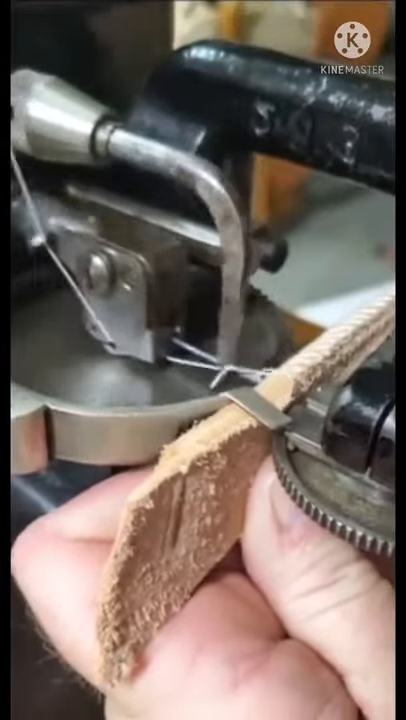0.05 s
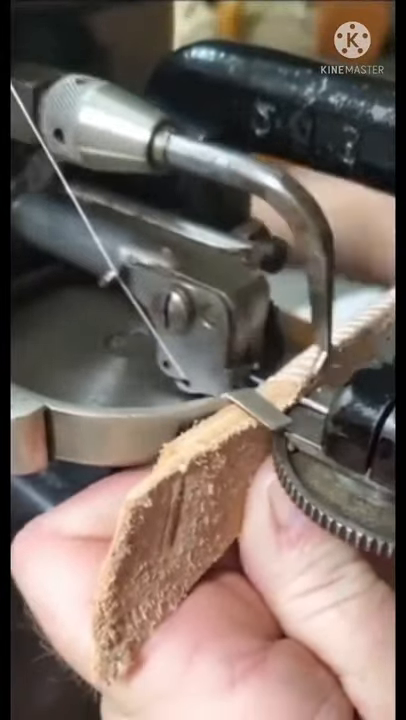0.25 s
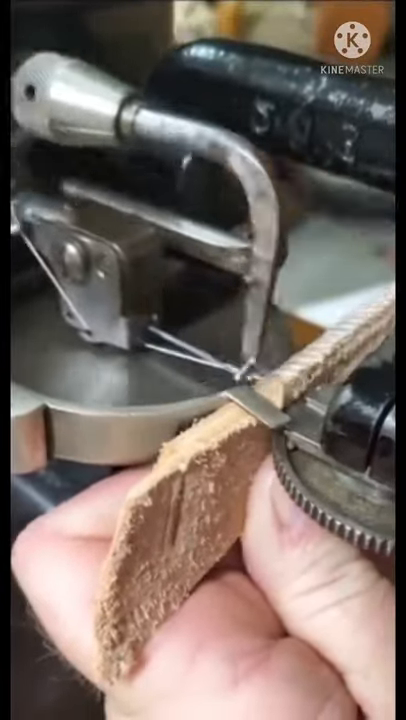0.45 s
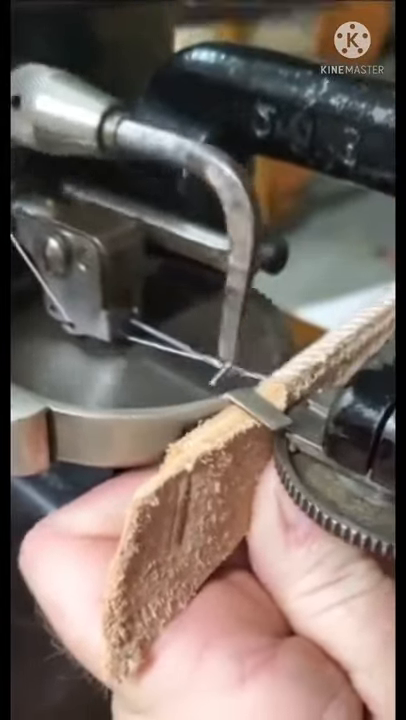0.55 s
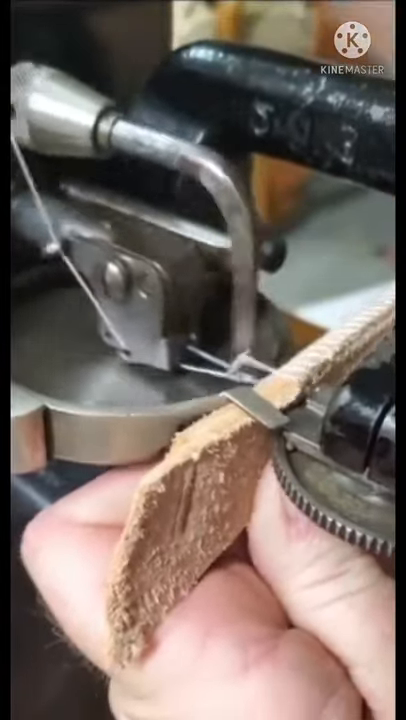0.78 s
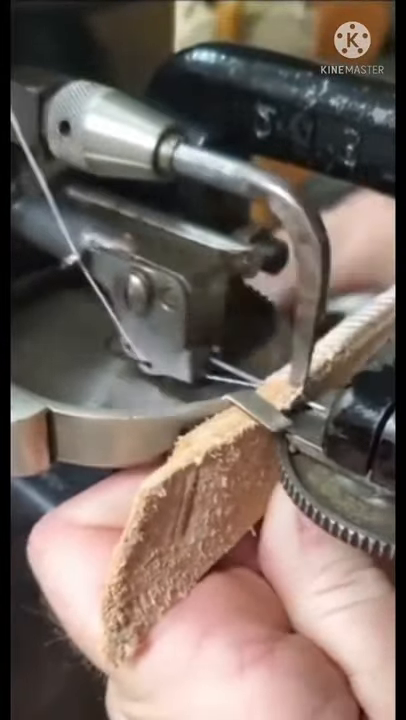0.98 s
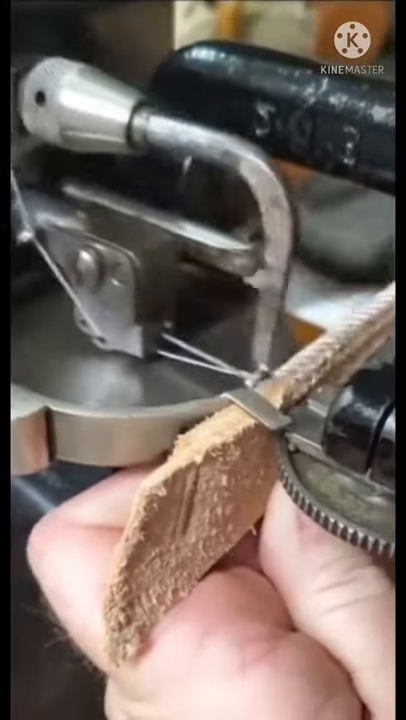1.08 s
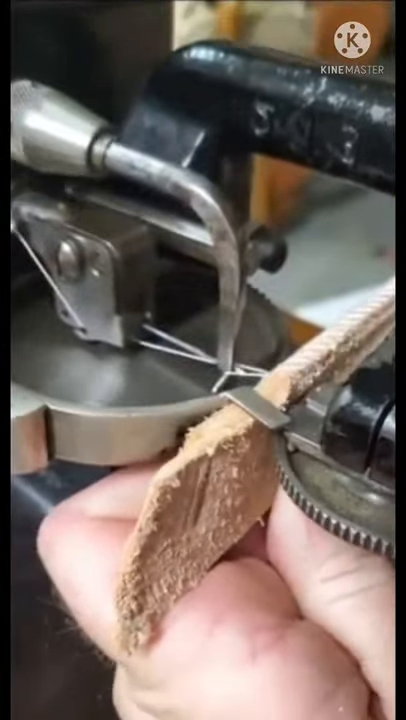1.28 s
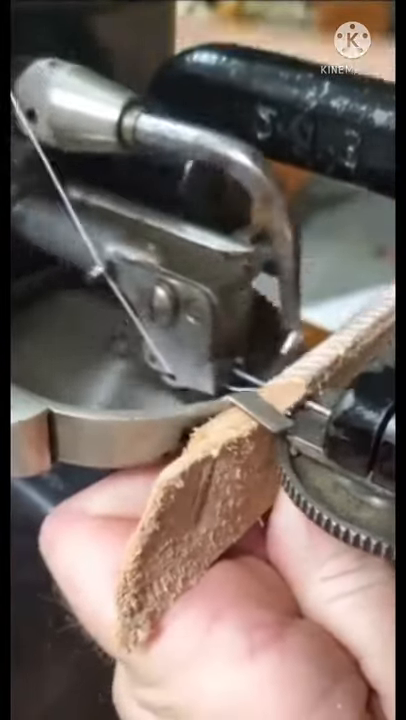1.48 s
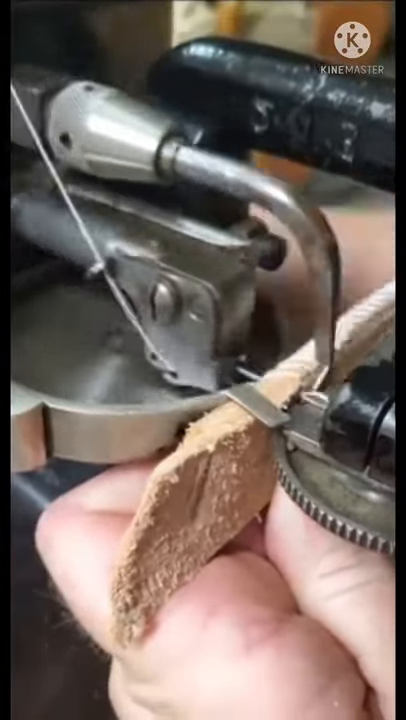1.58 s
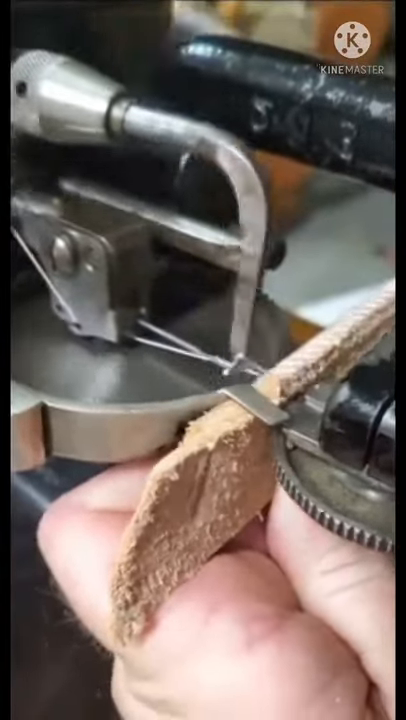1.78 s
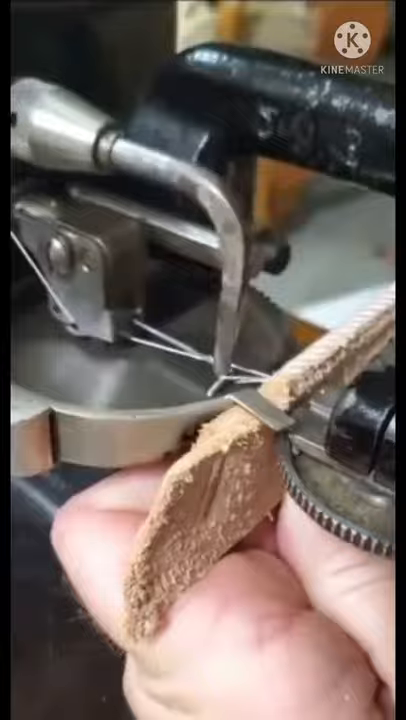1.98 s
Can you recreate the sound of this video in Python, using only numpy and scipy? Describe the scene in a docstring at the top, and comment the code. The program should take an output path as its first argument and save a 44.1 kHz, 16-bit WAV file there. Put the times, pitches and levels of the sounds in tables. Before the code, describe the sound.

Close by in a small workshop, a hand-turned sewing machine clacks steadily through thick hide three times. Thread snaps free, the needle squeaks, steel parts clack, and each stitch creaks tight with a knock, over faint gear murmur.

```python
"""A hand-cranked sewing machine makes three stitches in thick hide, close by in a small workshop.
Each turn: the thread snaps off the hook, the needle sticks and slips with a squeak (barely in turn three),
the feed slides and clacks, the stitch creaks tight and the linkage knocks back. The iron frame rings
under the blows, the bench thuds and the gears murmur, over a low room hum."""
import sys
import numpy as np
from scipy import signal
from scipy.fft import rfft, irfft
from scipy.io import wavfile
from scipy.ndimage import uniform_filter1d

SR = 44100
rng = np.random.default_rng(int(sys.argv[2]) if len(sys.argv) > 2 else 0)


def waveform_to_disk(signal):
    """Save audio, clipped to [-1, 1], as 16-bit WAV at the path in sys.argv[1]."""
    frames = np.transpose(np.atleast_2d(signal))
    scaled = np.clip(frames, -1, 1) * 32767
    samples = np.round(scaled).astype(np.int16)
    wavfile.write(sys.argv[1], SR, samples)


N = 90404


# Each row: start and length in seconds, first and last pitch in Hz, partials 1 to 3 in relative dB.
NEEDLE_SLIPS = [(.217, .017, 970, 985, -34, -26, -23), (.235, .024, 1215, 1085, -24, -24, -39),
                (.254, .02, 1100, 990, -29, -35, -42), (.271, .017, 990, 1010, -33, -35, -39),
                (.285, .019, 1080, 1120, -33, -37, -47), (.835, .013, 960, 915, -53, -41, -48),
                (.842, .013, 930, 880, -42, -48, -47), (.857, .012, 935, 945, -33, -30, -27),
                (.866, .012, 985, 1005, -29, -25, -26), (.879, .011, 1090, 1040, -33, -32, -46),
                (.888, .013, 1020, 990, -39, -33, -42), (.892, .025, 965, 950, -30.5, -42, -51),
                (.912, .016, 960, 950, -44, -45, -47), (.927, .012, 1110, 1050, -32, -43, -56),
                (.936, .014, 1045, 1015, -30.5, -40, -52), (.949, .02, 1080, 1030, -46, -42, -58),
                (1.615, .028, 1310, 1260, -44, -57, -61)]
# Each row: frequency in Hz, relative gain in dB.
RASP_COLOUR = [(60, -4), (130, 2), (300, -15), (700, -12), (1170, 6), (1450, -12), (2200, 5), (3000, -4),
               (4200, -6), (5200, -12), (7500, -12), (10000, -22)]
# Each row: frequency in Hz, left minus right in dB.
HIDE_PAN = [(100, 1), (500, 2), (1000, 7), (2200, 9), (4000, 2), (10000, -1)]

def needle_squeaks():
    """Steel sticks and slips in the hide: each slip is a short gliding tone with overtones, over a rasp."""
    tone_db, rasp_db, shimmer_db, left_lead_rad = -2.2, -26.5, 1.3, 1.35
    upper_db, upper_step_db = -14.5, -8
    tones, rasp = np.zeros((2, N)), np.zeros(N)
    jitter = 1 + .012 * wobble(70)
    shimmer = [shimmer_db * wobble(90) for _ in range(6)]
    for start, length, first_hz, last_hz, *levels in NEEDLE_SLIPS:
        span = np.arange(round(start * SR), round((start + length) * SR))
        progress = np.linspace(0, 1, len(span))
        pitch_hz = (first_hz + (last_hz - first_hz) * progress) * jitter[span]
        phase = 2 * np.pi * np.cumsum(pitch_hz) / SR
        swell = abs(np.sin(np.pi * progress)) ** .8
        rasp[span] += swell * amp(rasp_db + .7 * max(levels))
        upper_levels = [levels[-1] + upper_db + upper_step_db * k for k in range(3)]
        for k, db in enumerate(levels + upper_levels):
            lead = np.array([[left_lead_rad], [0]]) / (k + 1)
            partial = np.sqrt(2) * np.sin((k + 1) * phase + lead)
            tones[:, span] += swell * amp(db + shimmer[k][span]) * partial
    return amp(tone_db) * pan(8.5) * tones + colour(rasp * hiss(), RASP_COLOUR, HIDE_PAN)


# Each row: time in seconds, level in dB, treble tilt in dB per octave, lead-in rub in dB re the snap.
THREAD_SNAPS = [(.0942, -31, -1.5, -17), (.7488, -22.5, 0, -17), (1.4015, -26.5, -.5, -16)]
# Each row: frequency in Hz, T60 in seconds, relative level in dB.
HOOK_MODES = [(2780, .03, -6), (3590, .035, 0), (3700, .025, -4)]
# Each row: frequency in Hz, relative gain in dB.
SNAP_COLOUR = [(100, -25), (400, -8), (700, -6), (1100, -10), (1750, -3), (2200, -5), (2800, 0), (3150, -9),
               (3600, 5), (4100, -8), (5500, -9), (8000, -6), (10000, -13)]
# Each row: frequency in Hz, left minus right in dB.
THREAD_PAN = [(100, 2), (600, 0), (1200, 5), (2000, 8), (3400, 7), (5600, -5), (10000, -3)]

def thread_snaps():
    """The thread rubs along the hook, then snaps free; hook and frame ring."""
    frame_db, hook_db, rub_rise_s = -9, -3.5, .008
    t = clock()
    out = frame_ring([(at, db + frame_db) for at, db, _, _ in THREAD_SNAPS], "thread")
    out += pan(6) * ring([(at, db + hook_db) for at, db, _, _ in THREAD_SNAPS], HOOK_MODES)
    for at, db, tilt_db, rub_db in THREAD_SNAPS:
        rub = amp(rub_db) * (t < at) * np.exp(-abs(t - at) / rub_rise_s)
        snap = contact(at, hold_s=.003, fall_s=.0015, rattle_db=-13, rattle_s=.011)
        tilted = [(hz, gain_db + tilt_db * np.log2(hz)) for hz, gain_db in SNAP_COLOUR]
        out += colour(amp(db) * (rub + snap) * hiss(), tilted, THREAD_PAN)
    return out


# Each row: start in seconds, frame ring in dB, metal click in dB.
FEED_CLACKS = [(.3765, -48, -41), (.3865, -39, -46), (.4005, -26, -37), (.412, -32.5, -33),
               (1.033, -50, -34), (1.049, -26.5, -41), (1.0575, -31, -42), (1.063, -34, -42),
               (1.7195, -38, -44), (1.7345, -35, -47), (1.748, -28, -29), (1.7635, -34, -44)]
# Each row: start in seconds, length in seconds, level in dB.
FEED_SLIDES = [(.365, .075, -44), (1.035, .062, -45), (1.713, .06, -44), (.11, .11, -64), (1.405, .06, -58),
               (1.618, .032, -56), (1.96, .09, -62)]
# Each row: frequency in Hz, relative gain in dB.
FEED_COLOUR = [(100, -15), (400, 0), (800, -2), (1500, -2), (2100, 0), (2900, 0), (3700, -2), (4700, -8),
               (5800, 0), (6600, -5), (8200, -2), (10000, -17)]
# Each row: frequency in Hz, left minus right in dB.
METAL_PAN = [(100, 1), (500, 1.5), (1200, 2), (2500, 5), (5000, -2), (10000, -1)]

def feed_clacks():
    """Steel parts slide and strike in quick clusters of blows."""
    clicks = power_sum(amp(db) * contact(at, hold_s=.003, fall_s=.003, rattle_db=-14, rattle_s=.012)
                       for at, _, db in FEED_CLACKS)
    steel = colour(clicks * hiss() + friction(FEED_SLIDES), FEED_COLOUR, METAL_PAN)
    return steel + frame_ring([row[:2] for row in FEED_CLACKS], "feed")


# Each row: start in seconds, frame ring in dB, metal click in dB, spring ping in dB.
LINKAGE_KNOCKS = [(.049, -50, -62, -53), (.630, -27, -31, -60), (.6532, -34, -46, -70),
                  (1.285, -39, -41, -52), (1.3024, -37.5, -58, -70), (1.957, -44, -46, -34),
                  (1.9773, -38, -54, -70)]
# Each row: frequency in Hz, relative gain in dB.
LINKAGE_COLOUR = [(100, -12), (400, 0), (900, -3), (1300, 3), (2100, 0), (3000, -5), (3700, -1), (5000, -8),
                  (7500, -5), (10000, -11)]

def linkage_knocks():
    """The linkage knocks back and bounces; a small spring pings."""
    ping_hz, ping_t60_s = 5850, .03
    clicks = power_sum(amp(db) * contact(at, hold_s=.003, fall_s=.003, rattle_db=-8, rattle_s=.017)
                       for at, _, db, _ in LINKAGE_KNOCKS)
    metal = colour(clicks * hiss(), LINKAGE_COLOUR, METAL_PAN)
    ping = ring([(at, db) for at, _, _, db in LINKAGE_KNOCKS], [(ping_hz, ping_t60_s, 0)])
    return metal + frame_ring([row[:2] for row in LINKAGE_KNOCKS], "linkage") + ping


# Each row: frequency in Hz, T60 in seconds, relative dB when struck by feed, by linkage, by thread.
FRAME_MODES = [(95, .08, -14, -28, -22), (221, .12, -15, -3, -17), (280, .08, -8, -12, -20),
               (345, .115, -3, -3, -9), (385, .08, -4, -9, -9), (415, .08, -10, -20, -14),
               (505, .08, -7, -8, -6), (600, .07, -8, -13, -7), (700, .08, -6.5, -11, -5),
               (945, .07, -13, -13, -13), (1238, .10, -18, -4, -14), (1455, .08, -24, -16, -22),
               (2100, .06, -21, -12, -16)]

def frame_ring(blows, striker):
    """The iron frame rings with a mix of modes set by the place struck; it radiates little bass."""
    column = ("feed", "linkage", "thread").index(striker)
    modes = [(hz, t60_s, levels[column]) for hz, t60_s, *levels in FRAME_MODES]
    bass_cut = signal.butter(2, 150, "high", fs=SR, output="sos")
    return pan(2) * signal.sosfilt(bass_cut, ring(blows, modes))


# Each row: start in seconds, level in dB.
STITCH_CREAKS = [(.5828, -34), (.612, -45), (1.2055, -39), (1.237, -35), (1.886, -37), (1.918, -32),
                 (1.934, -45)]
# Each row: start in seconds, length in seconds, level in dB.
HIDE_RUBS = [(.14, .08, -54), (.183, .04, -43), (.30, .07, -55), (.53, .10, -54), (1.225, .047, -50),
             (1.614, .033, -51), (1.9, .045, -51)]
# Each row: frequency in Hz, relative gain in dB.
CREAK_COLOUR = [(100, -20), (400, -14), (650, -5), (820, -8), (960, 3), (1100, -7), (1300, 0), (1650, -3),
                (2100, 2), (2700, -5), (3300, -22), (5500, -30), (10000, -46)]
# Each row: frequency in Hz, relative gain in dB.
RUB_COLOUR = [(100, -8), (400, -4), (650, -1), (850, -3), (1200, 3), (1500, -9), (2200, -1), (3000, -8),
              (4000, -20), (6000, -21), (10000, -38)]

def stitch_creaks():
    """Thread drags through the hide and slips tight in dull little creaks."""
    slips = sum(amp(db) * contact(at, hold_s=.0012, fall_s=.0015, rattle_db=-8, rattle_s=.01)
                for at, db in STITCH_CREAKS)
    creaks = colour(slips * hiss(), CREAK_COLOUR, HIDE_PAN)
    return creaks + colour(friction(HIDE_RUBS), RUB_COLOUR, HIDE_PAN)


# Each row: start in seconds, level in dB.
BENCH_JOLTS = [(.2205, -43), (1.0495, -42)]
# Each row: frequency in Hz, T60 in seconds, relative level in dB.
BENCH_MODES = [(62, .12, -5), (105, .06, -2), (160, .04, -1)]

def bench_thuds():
    """Two hard strokes thud faintly through the bench."""
    return ring(BENCH_JOLTS, BENCH_MODES)


# Each row: time in seconds, level in dB.
GEAR_LEVELS = [(0, -57), (.2, -54), (.47, -54), (.53, -61), (.72, -54), (.81, -62), (1.0, -65), (1.15, -54),
               (1.2, -66), (1.36, -57), (1.46, -58), (1.53, -75), (1.69, -64), (1.85, -57), (2.02, -57),
               (2.05, -47)]
# Each row: frequency in Hz, relative gain in dB.
GEAR_COLOUR = [(60, -2), (150, -9), (220, -3), (280, -5), (345, 3), (450, -3), (700, -7), (1200, -11),
               (1600, -18), (2500, -17), (4500, -26), (6500, -23), (10000, -38)]

def gear_murmur():
    """The crank gears murmur unevenly through the frame."""
    level = amp(np.interp(clock(), *np.transpose(GEAR_LEVELS)))
    uneven_noise = unit_rms(hiss() * amp(2.5 * wobble(500)))
    return colour(level * uneven_noise, GEAR_COLOUR, METAL_PAN)


def near_reflections(direct):
    """Quick reflections off the machine and bench."""
    delay_s, fall_s = .002, .008
    t = clock()[:SR // 10]
    taps = rng.standard_normal((2, len(t))) * np.exp(-t / fall_s) * (t > delay_s)
    return convolve(direct, taps / np.linalg.norm(taps[0]))


# Each row: frequency in Hz, T60 in seconds.
ROOM_DECAY = [(100, .3), (400, .3), (1200, .28), (4000, .26), (10000, .18)]

def room_tail(direct):
    """Short workshop reverberation, each band dying at its own rate."""
    hz, t, bands = signal.stft(hiss()[:, :SR // 2], SR, nperseg=256)
    decay = np.exp(-np.log(1000) * t / at_hz(ROOM_DECAY, hz)[:, None])
    _, tail = signal.istft(bands * decay * (t > .006), SR, nperseg=256)
    return convolve(direct, tail / np.linalg.norm(tail[0]))


# Each row: frequency in Hz, relative gain in dB.
AIR_COLOUR = [(20, -11), (40, -2), (62, 1), (85, 0), (120, -5), (200, -12), (350, -15), (800, -22),
              (1230, -16), (1550, -25), (2200, -20), (4300, -35), (7500, -38), (10000, -52)]

def room_hum():
    """A low, wavering hum in still air."""
    hum_hz, hum_db, air_db = 59, -61, -58.5
    pitch_hz = hum_hz * (1 + .04 * wobble(4000))
    hum = np.sqrt(2) * np.sin(2 * np.pi * np.cumsum(pitch_hz) / SR)
    air = colour(hiss(), AIR_COLOUR, pan_curve=[(100, 1), (10000, 0)])
    return amp(air_db) * air + amp(hum_db) * hum


# Each row: frequency in Hz, left-right correlation.
NOISE_CORRELATION = [(50, .96), (300, .88), (600, .7), (1200, .5), (2500, .6), (5000, .65), (9000, .88)]

def hiss():
    """Stereo white noise, most alike in the bass."""
    left, independent = rfft(rng.standard_normal((2, N)))
    alike = np.clip(at_hz(NOISE_CORRELATION, np.fft.rfftfreq(N, 1 / SR)), -1, 1)
    right = alike * left + np.sqrt(1 - alike ** 2) * independent
    return irfft(np.array([left, right]), N)


def contact(start_s, hold_s, fall_s, rattle_db, rattle_s, attack_s=.0012):
    """Envelope of one contact: brief hold, quick fall, weaker rattle."""
    age = np.maximum(clock() - start_s, 0)
    hit = np.exp(-np.maximum(age - hold_s, 0) / fall_s)
    rattle = amp(rattle_db) * np.exp(-age / rattle_s)
    return np.minimum(age / attack_s, 1) * np.hypot(hit, rattle)


def ring(blows, modes, rise_s=.0011, lag_s=.0002):
    """Blows (s, dB) strike damped modes (Hz, T60 s, dB); alternate modes lead on opposite sides."""
    t, impulses, response = clock()[:SR // 4], np.zeros((1, N)), 0
    for start, db in blows:
        impulses[0, round(start * SR)] += amp(db)
    for k, (hz, t60_s, db) in enumerate(modes):
        lead = (-1) ** k * min(2 * np.pi * hz * lag_s, 1) * np.array([[.5], [-.5]])
        response += amp(db) * np.exp(-np.log(1000) * t / t60_s) * np.sin(2 * np.pi * hz * t + lead)
    return convolve(impulses, response * np.minimum(t / rise_s, 1))


def friction(strokes, edge_s=.012, grain_db=2.2):
    """Grainy sliding noise that swells and fades with each stroke."""
    t = clock()
    level = power_sum(amp(db) * np.clip(np.minimum(t - start, start + length - t) / edge_s, 0, 1)
                      for start, length, db in strokes)
    return level * unit_rms(hiss() * amp(grain_db * wobble(60)))


def colour(x, gain_curve, pan_curve, size=4096):
    """Minimum-phase filter, scaled to unit power, then panned by frequency."""
    hz = abs(np.fft.fftfreq(size, 1 / SR))
    gain = unit_rms(amp(at_hz(gain_curve, hz))) * pan(at_hz(pan_curve, hz))
    spectrum = np.exp(np.conj(signal.hilbert(np.log(gain))))
    return convolve(x, np.fft.ifft(spectrum).real[:, :size // 2])


def wobble(samples):
    """Smooth random motion, rms one."""
    return unit_rms(uniform_filter1d(uniform_filter1d(rng.standard_normal(N), samples), samples))


def pan(db):
    """Stereo gains for a left-minus-right level."""
    left = amp(np.atleast_1d(db))
    return 2 * np.array([left, np.ones_like(left)]) / (1 + left)


def at_hz(curve, hz):
    """Interpolates on a log-frequency axis."""
    knots_hz, values = np.transpose(curve)
    return np.interp(np.log(hz + 1), np.log(knots_hz + 1), values)


def convolve(x, taps):
    return signal.fftconvolve(x, taps, axes=1)[:, :N]


def power_sum(envelopes):
    return np.sqrt(sum(envelope ** 2 for envelope in envelopes))


def unit_rms(x):
    return x / np.sqrt(np.mean(x ** 2) + 1e-20)


def amp(db):
    return 10 ** (np.asarray(db) / 20)


def clock():
    return np.arange(N) / SR


def scene():
    """The machine in its workshop."""
    near_db, room_db = -11, -17
    machine = thread_snaps() + feed_clacks() + linkage_knocks() + stitch_creaks()
    squeaks = needle_squeaks()
    machine += squeaks + amp(near_db) * near_reflections(squeaks) + bench_thuds() + gear_murmur()
    return machine + amp(room_db) * room_tail(machine) + room_hum()


def record(dry):
    """Steep low-pass on the whole mix."""
    cutoff_hz = 9850
    taps = signal.firwin(401, cutoff_hz, window=("kaiser", 7), fs=SR)
    return signal.oaconvolve(dry, taps[None], "same")


dry = scene()
out = record(dry)
waveform_to_disk(out)
```